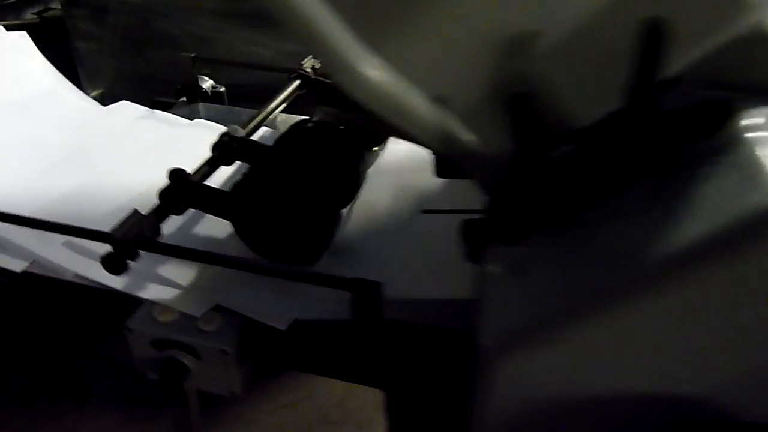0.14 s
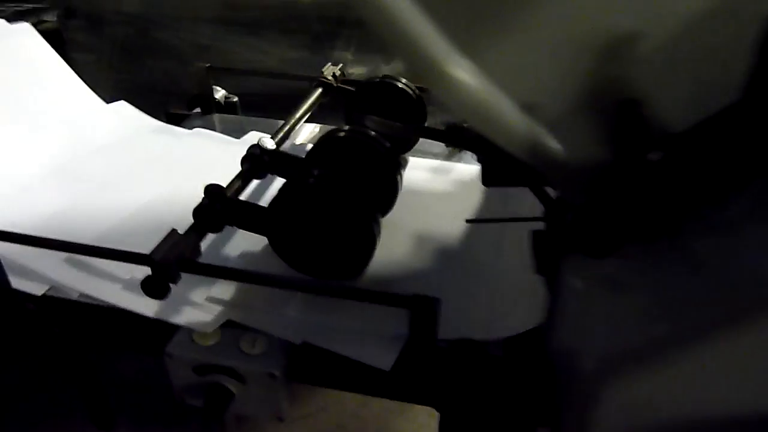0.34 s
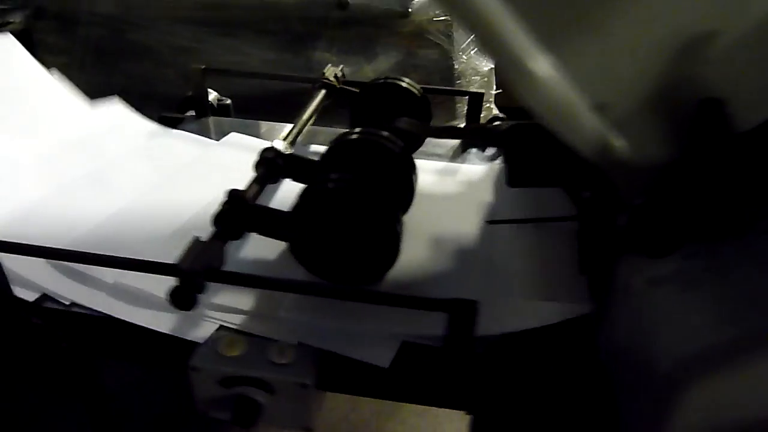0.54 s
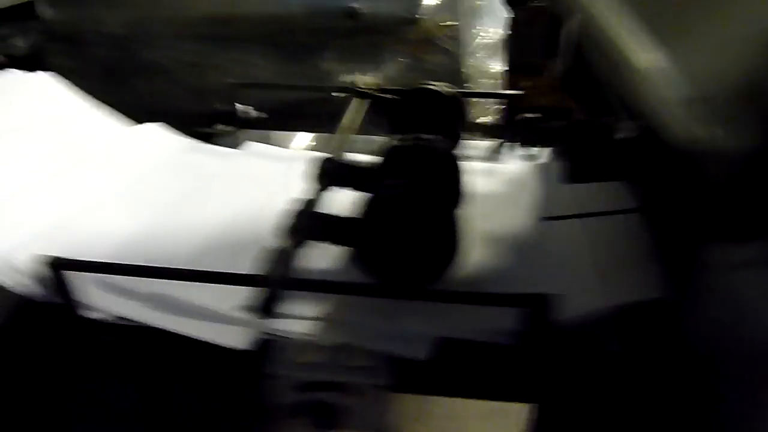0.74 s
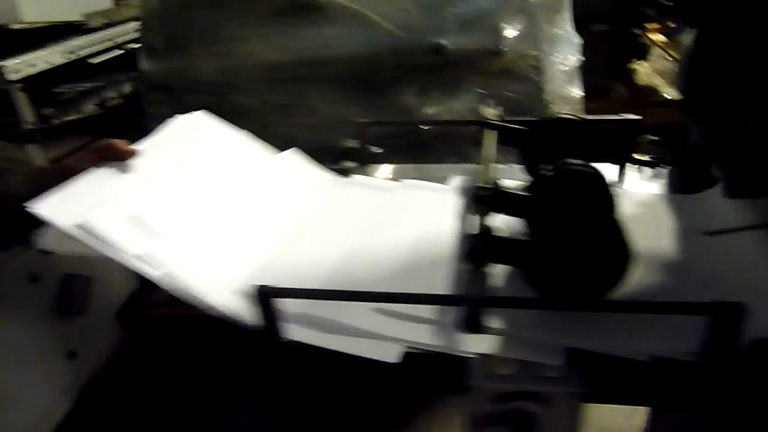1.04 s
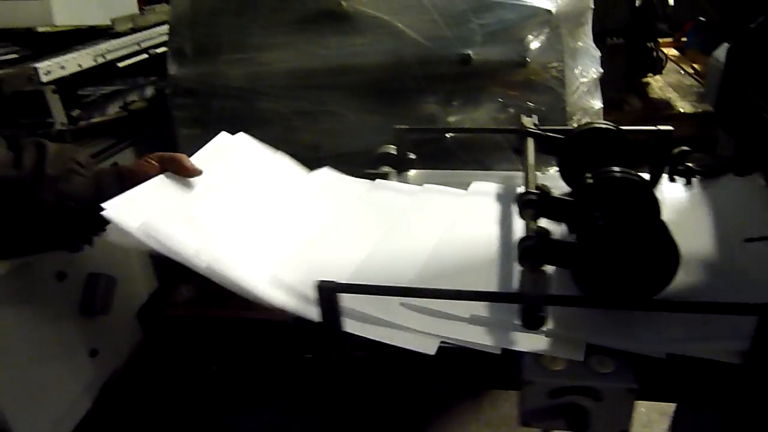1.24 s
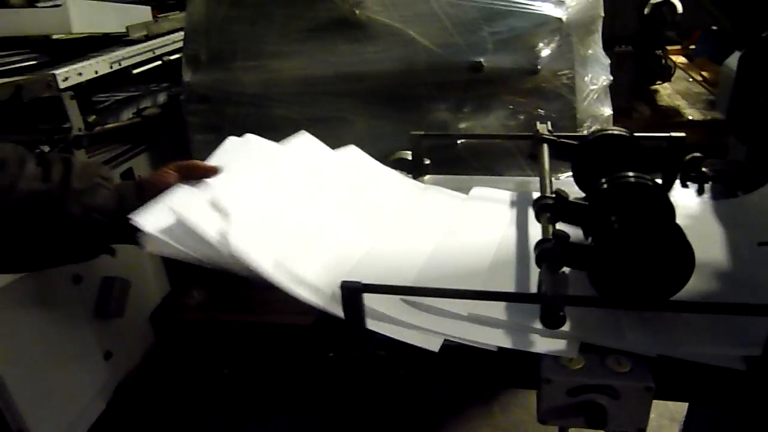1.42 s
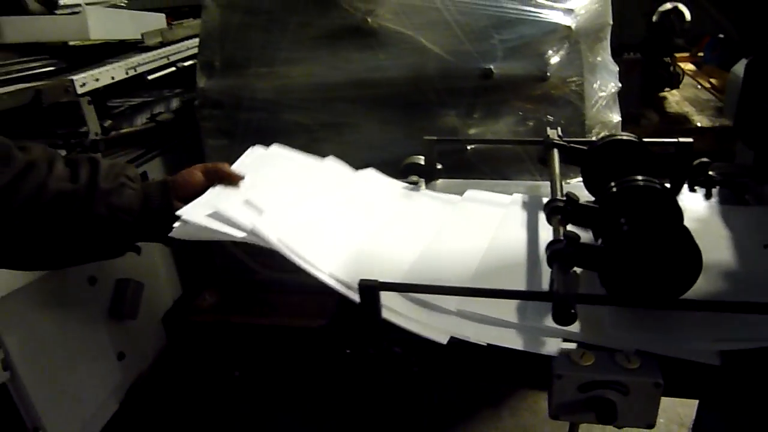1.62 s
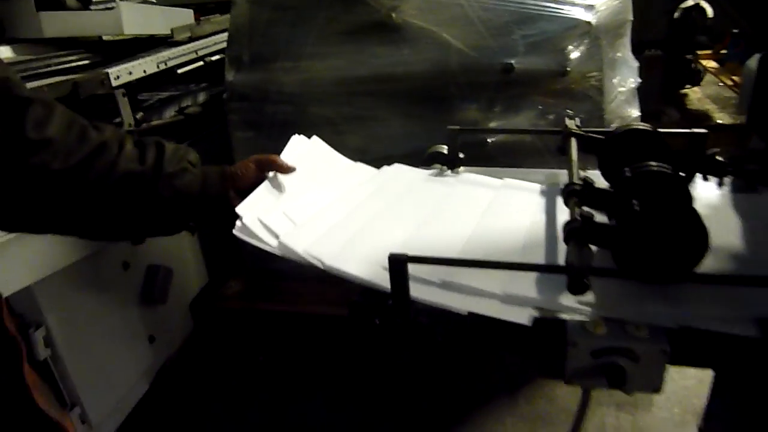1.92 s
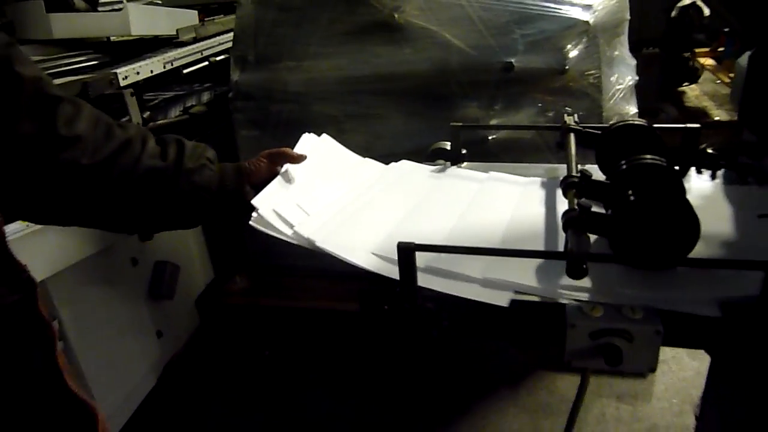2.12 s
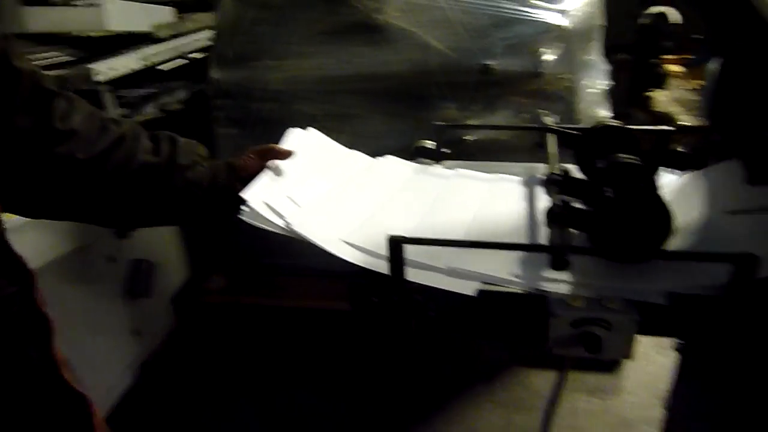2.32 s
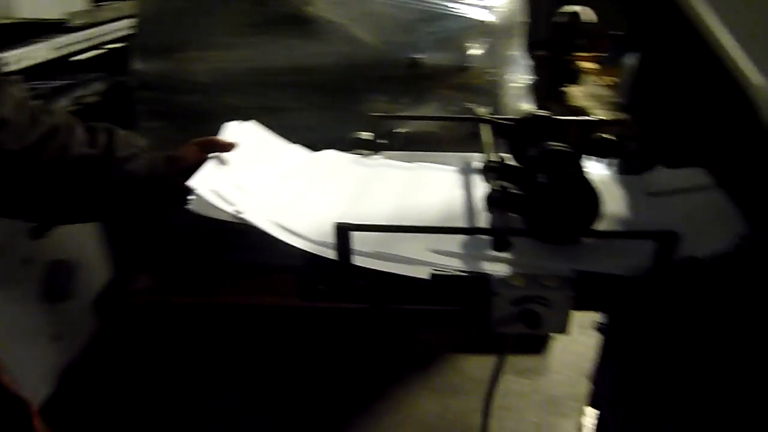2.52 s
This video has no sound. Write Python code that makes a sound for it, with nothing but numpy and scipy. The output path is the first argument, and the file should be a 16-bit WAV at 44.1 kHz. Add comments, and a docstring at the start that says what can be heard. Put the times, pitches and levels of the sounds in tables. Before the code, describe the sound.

A paper folding machine hums and rushes steadily, clacking sharply about twice a second in a workshop

```python
"""The air pump of a paper folding machine hums, throbbing once per shaft turn, with a thin whine on top.
Hum and whine are sums of sines; about twice a second a sheet clacks through the fold, made of noise bursts,
decaying modes ring as metal ticks and low knocks, and one sheet swishes onto the pile.
Rollers and belts rumble as filtered noise and sing as wavering sines; air and sliding paper hiss
as filtered noise, mostly a little to the right. It is heard in a workshop, beside the delivery table."""
import sys
import numpy as np
from scipy import signal
from scipy.fft import rfft, irfft
from scipy.io import wavfile

SR = 44100
rng = np.random.default_rng(int(sys.argv[2]) if len(sys.argv) > 2 else 0)


def digitize_waveform(pressure):
    """Quantize a signal to 16-bit integers and store it at the path in sys.argv[1].

    Rows of a 2-D input are taken as channels; values are limited to [-1, 1].
    """
    field = np.atleast_2d(pressure).T
    bounded = np.clip(field, -1, 1)
    quanta = np.round(bounded * 32767).astype(np.int16)
    wavfile.write(sys.argv[1], SR, quanta)


N = 117306
T = np.arange(N) / SR   # seconds
FREQS = np.fft.rfftfreq(N, 1 / SR) + 1e-3   # Hz, kept above zero for the logarithm

# Course of the hum, used relative to its mean. Each row: time in seconds, level in dB.
HUM_COURSE = [(0.0, -22), (.5, -20.5), (.78, -18.5), (1.02, -21.5), (1.28, -19.5), (1.43, -23.5),
              (1.6, -21), (2.4, -22), (2.66, -24.5)]
# Load on the shaft, throbbing once, twice and three times per turn in successive rows.
# Each row: share of the level (ratio), swing of the phase in radians, time of a dip in seconds.
LOAD_THROB = [(.42, .3, .030), (.12, .16, .0253), (.06, .08, .0285)]
# Weaker tones of the drive. Each row: multiple of the shaft rate (ratio), level in dB.
DRIVE_TONES = [(2, -69), (7, -42.5), (11, -56), (20, -43), (21, -38.5), (22, -43), (23, -41), (29, -41),
               (31, -41), (35, -40.5), (49, -45)]
# Harmonics of the hum before trim. Each row: time in seconds, second harmonic in dB, third harmonic in dB.
HUM_OVERTONES = [(0.05, -36, -45), (1.31, -34.5, -32), (1.41, -34.5, -38), (2.6, -29.5, -37.5)]
# Partials of the whine. Each row: multiple of half the hum's pitch (ratio), level in dB before panning.
WHINE_PARTIALS = [(44, -53), (47, -54), (48, -45.5), (50, -44.5), (51, -47.5), (52, -40), (53, -51),
                  (54, -51), (56, -51), (62, -53)]

# Clacks of the fold. Each row: time of the peak in seconds, level in dB, rise time constant in seconds,
# decay time constant in seconds, weight of the thud relative to the snap in dB.
FOLD_CLACKS = [(.297, -24, .012, .035, -3), (.335, -27, .004, .02, 5), (.805, -21.5, .012, .007, 1),
               (.844, -17, .008, .008, -1), (.875, -27, .004, .012, 4), (1.3832, -14, .001, .003, -4),
               (1.42, -22, .002, .006, -1), (1.9165, -15.5, .002, .004, 0), (1.951, -22, .002, .008, 5)]
# Relative spectrum of the snap. Each row: frequency in Hz, density in dB per Hz.
SNAP_SPECTRUM = [(500, 4), (900, -5), (1400, -2), (1900, -0.5), (2500, 1), (3200, 1.5), (3800, -2),
                 (4600, -4), (7000, -21), (12000, -52)]
# Relative spectrum of the thud. Each row: frequency in Hz, density in dB per Hz.
THUD_SPECTRUM = [(110, -2), (190, -5), (260, 1), (480, 5.5), (900, -1.5), (1600, -14)]
# Relative spectrum of the swish. Each row: frequency in Hz, density in dB per Hz.
SWISH_SPECTRUM = [(3000, -24), (7000, 8), (11000, 0), (15500, -16)]
# Blows on a small steel part. Each row: start in seconds, peak in dB of a mode at the favoured pitch
# before panning, favoured pitch in Hz, spread in Hz, time to fall by 60 dB in seconds.
TICK_BLOWS = [(.8375, -19, 3400, 400, .02), (.8425, -17, 3100, 1400, .02), (1.0315, -20.5, 3760, 150, .04),
              (1.3832, -14, 3780, 170, .035), (1.9165, -18, 3520, 200, .03), (1.951, -19, 3000, 200, .025),
              (2.4555, -7.5, 3800, 520, .016), (2.467, -22, 3700, 300, .04)]
# Modes of the small steel part. Each entry: frequency in Hz.
TICK_MODES = [2400, 2980, 3540, 3770, 4170, 4450]
# Blows on the frame. Each row: start in seconds, level in dB to which each mode's own level is added.
FRAME_BLOWS = [(.335, -29), (1.915, -28), (1.9495, -22)]
# Modes of the frame. Each row: frequency in Hz, relative level in dB, time to fall by 60 dB in seconds.
FRAME_MODES = [(208, -6, .35), (262, -3, .08), (520, 4, .03), (780, 1, .02)]

# Rumble of rollers and belts. Each row: frequency in Hz, density in dB per Hz.
RUMBLE_SPECTRUM = [(20, -93), (45, -81), (75, -78), (100, -68.5), (125, -70), (150, -61.5), (205, -58.5),
                   (235, -60.5), (300, -53.5), (410, -59), (520, -54.5), (640, -55), (740, -56.5),
                   (930, -59.5), (1200, -61.5), (1500, -73), (2500, -83.5)]
# Course of the rumble, used relative to its mean. Each row: time in seconds, level in dB.
RUMBLE_COURSE = [(0.0, -25.5), (0.8, -28.5), (0.83, -27), (1.0, -33), (1.03, -28.5), (2.66, -28.5)]
# Swells of the upper roller note. Each row: time of the peak in seconds, level in dB,
# half length to 1/e in seconds.
SING_SWELLS = [(0.164, -30, 0.033), (0.358, -22, 0.012), (0.506, -30, 0.024), (0.638, -32, 0.035),
               (0.76, -38, .03), (0.86, -33, 0.018), (1.035, -30, 0.018), (1.228, -36, 0.0091),
               (1.455, -23.5, 0.02), (1.726, -37, 0.018), (2.057, -28.5, 0.031), (2.114, -33, 0.013)]
# Rush of air and paper. Each row: frequency in Hz, density in dB per Hz.
RUSH_SPECTRUM = [(600, -81.5), (1000, -70), (1400, -63.5), (2100, -63.5), (3000, -63), (4200, -63),
                 (5000, -61), (5500, -62), (6000, -60.5), (7000, -61.5), (8000, -64), (9200, -64.5),
                 (11000, -89), (16000, -95)]
# Course of the rush, used relative to its mean. Each row: time in seconds, level in dB.
RUSH_COURSE = [(0.02, -25), (0.06, -23.5), (0.36, -25), (2.04, -26), (2.05, -25.5), (2.62, -24)]
# Fine hiss of sliding sheets. Each row: frequency in Hz, density in dB per Hz.
HISS_SPECTRUM = [(5000, -88.5), (8500, -69.5), (10500, -66), (12000, -68.5), (13200, -68), (14500, -73),
                 (16000, -79)]
# Course of the hiss, used relative to its mean. Each row: time in seconds, level in dB.
HISS_COURSE = [(0.02, -35.5), (.14, -34.3), (.3, -37), (.39, -40.5), (.57, -35), (.68, -37.5), (.83, -35.5),
               (1.12, -37.7), (1.33, -34.5), (1.47, -37.2), (2.02, -36), (2.12, -34.5), (2.62, -33.5)]
# Air whistling past edges. Each row: start in seconds, length in seconds, centre in Hz, width in Hz,
# level in dB.
EDGE_WHISTLES = [(0.0, 2.64, 1730, 79, -40), (0.0, 0.42, 4940, 170, -34.5), (.55, 0.8, 5040, 170, -36.5),
                 (.5, 0.86, 6120, 120, -37.5), (2.058, 0.45, 6530, 330, -30), (2.06, .6, 4980, 200, -42)]
# Stereo balance. Each row: frequency in Hz, left minus right in dB.
STEREO_BALANCE = [(100, 1.4), (350, 0.72), (800, -.5), (1400, -4), (2200, -6), (6000, -6.5), (8500, -4.5),
                  (10500, -1.3), (15000, -1.3)]
# Likeness of the two channels. Each row: frequency in Hz, shared part of the power (0 to 1).
STEREO_LIKENESS = [(40, 0.77), (150, 0.98), (700, 1), (1200, 0.9), (2200, 0.73), (3200, 0.38), (6000, 0.33),
                   (9500, 0.19), (12000, 0.45), (15500, 0.7)]

SHAFT_HZ, HUM_ORDER = 24.167, 14   # the hum lies on the 14th multiple of the shaft rate
HUM_HZ = HUM_ORDER * SHAFT_HZ
HUM_DB, HUM_JITTER_RAD, PHASE_LEAD_RAD = -21.5, .06, .8
SECOND_TRIM_DB, THIRD_TRIM_DB = -.5, -3.5
OVERTONE_WAVER_DB, DRIVE_WAVER_DB = 1.2, 3.5
WHINE_WAVER_DB, WHINE_PAN_DB = 3.2, -4.5   # negative pan lies to the right
CLACK_LOW_CUT_HZ = 145
SWISH_S, SWISH_WIDTH_S, SWISH_DB, SWISH_PAN_DB = .964, .025, -23.5, 5
TICK_RISE_S, KNOCK_RISE_S = .0004, .0012
TICK_FALL_DB = 7   # loss of a mode one spread away from the favoured pitch
SING_HZ, SING_WAVER_HZ, SING_SAG_HZ = 862, 4, 10
SING_DB, SING_WAVER_DB = -35, 2
ROLLER_TURN_S, SAG_S = .269, .365   # period, and the time of one of the pitch sags
LOW_SING_HZ, LOW_SING_WAVER_HZ = 744, 11
LOW_SING_DB, LOW_SING_WAVER_DB = -43.5, 4.4
WHISTLE_FADE_S, WHISTLE_WAVER_DB = .12, 1.5
LEFT_LAG_S, LAG_ABOVE_HZ = .000042, 3200
CUTOFF_HZ = 15700


def pump():
    """Amplitude and phase modulation: a load periodic in the shaft turn throbs the hum among steadier tones."""
    level = 1
    phase = 2 * np.pi * HUM_HZ * T + HUM_JITTER_RAD * drift(9.8)
    for k, (share, radians, dip_s) in enumerate(LOAD_THROB, 1):
        turn = 2 * np.pi * k * SHAFT_HZ * (T - dip_s)
        level = level - share * np.cos(turn)
        phase = phase + radians * np.cos(turn + PHASE_LEAD_RAD / k)
    hum = rms_one(level * np.cos(phase))
    out = from_db(HUM_DB) * hum * swing(HUM_COURSE, share=1.0)

    second_db, third_db = in_time(HUM_OVERTONES)
    trimmed = [(2, second_db + SECOND_TRIM_DB), (3, third_db + THIRD_TRIM_DB)]
    for harmonic, db in trimmed:
        gain = from_db(db + OVERTONE_WAVER_DB * drift(8))
        out += gain * tone(harmonic * HUM_HZ, jitter=.2)

    for order, db in DRIVE_TONES:
        gain = from_db(db + DRIVE_WAVER_DB * drift(4.6))
        out += gain * tone(order * SHAFT_HZ, jitter=.41)
    hum_bin = np.searchsorted(FREQS, HUM_HZ)
    return out * panned(across_hz(STEREO_BALANCE)[hum_bin])


def whine():
    """Additive synthesis: high partials of the pump flutter independently on each side."""
    sides = np.zeros((2, N))
    for side in sides:
        for multiple, db in WHINE_PARTIALS:
            flutter = rms_one(from_db(WHINE_WAVER_DB * drift(9)))
            side += from_db(db) * flutter * tone(multiple * HUM_HZ / 2, jitter=.8)
    return sides * panned(WHINE_PAN_DB)


def sheets():
    """Impulsive noise: each sheet snaps through the fold with a thud; one swishes onto the pile."""
    snap, thud = np.zeros(N), np.zeros(N)
    for s, db, rise, decay, thud_db in FOLD_CLACKS:
        shape = from_db(db) * np.exp(-np.maximum((s - T) / rise, (T - s) / decay))
        snap += shape
        thud += shape * from_db(thud_db)
    snap_noise = rms_one(coloured(SNAP_SPECTRUM) * from_db(1.1 * drift(300)))
    thud_noise = rms_one(coloured(THUD_SPECTRUM))
    clack = snap * snap_noise + thud * thud_noise
    low_cut = signal.butter(4, CLACK_LOW_CUT_HZ, "high", fs=SR, output="sos")

    swish_shape = np.exp(-((T - SWISH_S) / SWISH_WIDTH_S) ** 2)
    swish = from_db(SWISH_DB) * swish_shape * panned(SWISH_PAN_DB) * rms_one(coloured(SWISH_SPECTRUM))
    return signal.sosfilt(low_cut, clack) + swish


def ticks():
    """Modal excitation: each blow on a small steel part favours the modes near one pitch."""
    out = np.zeros(N)
    for s, db, centre_hz, spread_hz, t60 in TICK_BLOWS:
        for hz in TICK_MODES:
            loss_db = TICK_FALL_DB * abs(hz - centre_hz) / spread_hz
            out += struck(s, hz, db - loss_db, t60, TICK_RISE_S)
    return out * panned(pan_db=-6)


def knocks():
    """Modal superposition: the heavier blows set the damped modes of the frame booming."""
    out = np.zeros(N)
    for s, db in FRAME_BLOWS:
        for hz, mode_db, t60 in FRAME_MODES:
            out += struck(s, hz, db + mode_db, t60, KNOCK_RISE_S)
    return out


def rollers():
    """Broadband rumble with frequency-modulated notes: the upper one sags in pitch once per roller turn."""
    rumble = coloured(RUMBLE_SPECTRUM) * swing(RUMBLE_COURSE, share=.82)
    level = from_db(SING_DB + SING_WAVER_DB * drift(7.2))
    for s, db, half in SING_SWELLS:
        level = level + from_db(db) * np.exp(-((T - s) / half) ** 2)
    sag = SING_SAG_HZ * np.cos(2 * np.pi * (T - SAG_S) / ROLLER_TURN_S)
    sing = level * tone(SING_HZ - sag + SING_WAVER_HZ * drift(8.6))
    low_level = from_db(LOW_SING_DB + LOW_SING_WAVER_DB * drift(3.9))
    low_sing = low_level * tone(LOW_SING_HZ + LOW_SING_WAVER_HZ * drift(7.15))
    return rumble + sing + low_sing


def air():
    """Flow noise: broad spectra give rush and hiss, narrow resonance curves give breathy whistles."""
    rush = coloured(RUSH_SPECTRUM) * swing(RUSH_COURSE, share=.89) * from_db(.5 * drift(23))
    hiss = coloured(HISS_SPECTRUM) * swing(HISS_COURSE, share=1.0) * from_db(.57 * drift(30))
    out = rush + hiss
    for start, length, hz, width_hz, db in EDGE_WHISTLES:
        inside = np.minimum(T - start, start + length - T)
        gate = np.clip(inside / WHISTLE_FADE_S + .5, 0, 1)   # half open at start and end
        resonance = 1 / (1 + 2 * ((FREQS - hz) / width_hz) ** 2)
        gain = from_db(db + WHISTLE_WAVER_DB * drift(3.5))
        out += gain * gate * rms_one(wide_noise(resonance))
    return out


def struck(s, hz, db, t60, rise):
    """Damped oscillation: one mode rings from a blow at time s and decays exponentially."""
    age = np.maximum(T - s, 0)
    decay = from_db(db - np.minimum(60 * age / t60, 200))
    onset = np.minimum(age / rise, 1)
    return decay * onset * np.sin(2 * np.pi * (hz * age + rng.random()))


def tone(hz, jitter=0):
    """Phase as the integral of frequency: a sine of unit power, with phase jitter in radians."""
    cycles = np.cumsum(hz + 0 * T) / SR + rng.random()
    return np.sqrt(2) * np.sin(2 * np.pi * cycles + jitter * drift(6.4))


def wide_noise(gain):
    """Partial coherence: a direct part reaches the left ear later; a diffuse part comes from the room."""
    direct, *diffuse = rfft(rng.standard_normal((3, N)))
    alike = np.clip(across_hz(STEREO_LIKENESS), 0, .999)
    lag = LEFT_LAG_S / (1 + (LAG_ABOVE_HZ / FREQS) ** 4)   # vanishes at low frequencies
    arrival = np.array([np.exp(-2j * np.pi * FREQS * lag), np.ones_like(lag)])
    pair = np.sqrt(alike) * direct * arrival + np.sqrt(1 - alike) * np.array(diffuse)
    balance = panned(across_hz(STEREO_BALANCE))
    return irfft(pair * gain * balance, N) * np.sqrt(SR / 2)   # gain becomes a density per Hz


def coloured(spectrum):
    """Spectral shaping: stereo noise with a power density in dB per Hz."""
    return wide_noise(from_db(across_hz(spectrum)))


def drift(rate):
    """Low-pass random process: slow chance with zero mean and spread 1, its corner at rate in Hz."""
    slow = irfft(rfft(rng.standard_normal(N)) / (1 + 1j * FREQS / rate) ** 2, N)
    return rms_one(slow - slow.mean())


def swing(curve, share):
    """Amplitude modulation: a gain following a share of a level curve's departure from its mean."""
    db, = in_time(curve)
    return from_db(share * (db - db.mean()))


def panned(pan_db):
    """Level difference between channels: left and right gains, positive to the left."""
    return from_db(pan_db * np.array([[.5], [-.5]]))


def in_time(rows):
    """Linear interpolation in time: each column of a curve, at every sample."""
    s, *columns = np.transpose(rows)
    return [np.interp(T, s, column) for column in columns]


def across_hz(points):
    """Interpolation over log frequency: a table's values along the frequency axis."""
    hz, values = np.transpose(points)
    return np.interp(np.log(FREQS), np.log(hz), values)


def from_db(db):
    """Logarithmic level: decibels to amplitude gain."""
    return 10 ** (np.asarray(db) / 20)


def rms_one(x):
    """Mean square as power: scale to unit power."""
    return x / np.sqrt(np.mean(x ** 2))


def scene():
    """Superposition: the pressures of all parts of the running machine add."""
    return pump() + whine() + sheets() + ticks() + knocks() + rollers() + air()


def record(dry):
    """Band limitation: a steep elliptic low-pass cuts the top."""
    low_pass = signal.ellip(12, .1, 90, CUTOFF_HZ, fs=SR, output="sos")
    return signal.sosfilt(low_pass, dry)


dry = scene()
out = record(dry)
digitize_waveform(out)
```